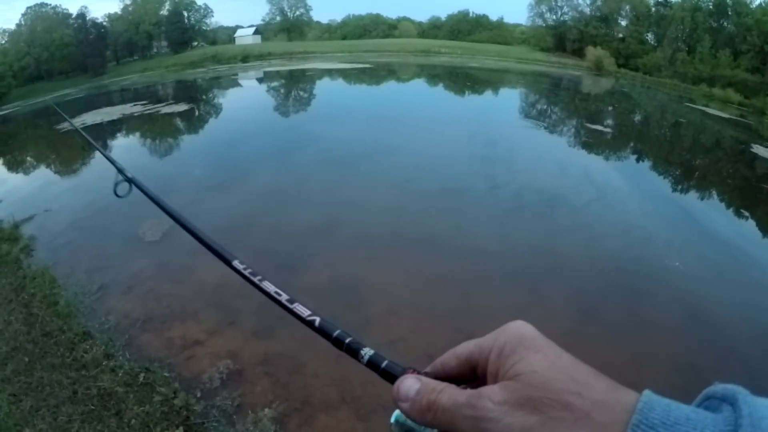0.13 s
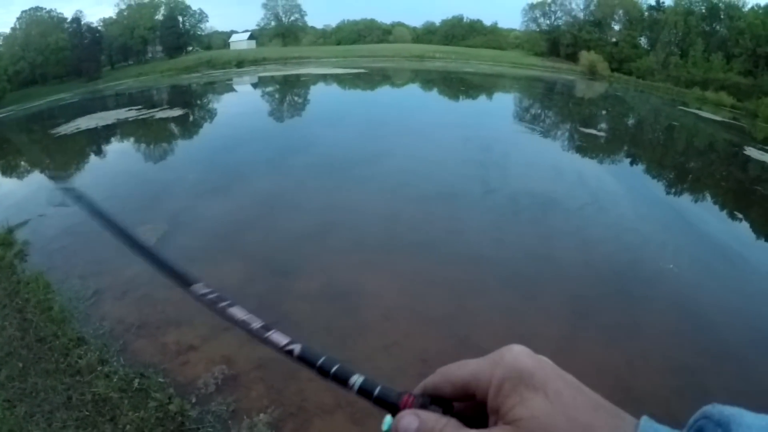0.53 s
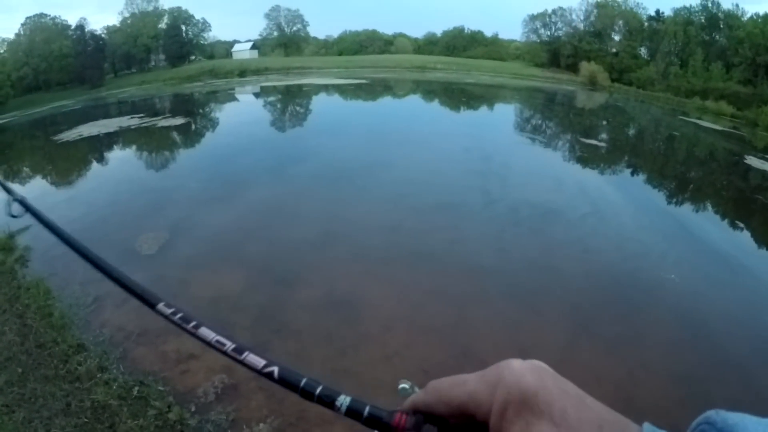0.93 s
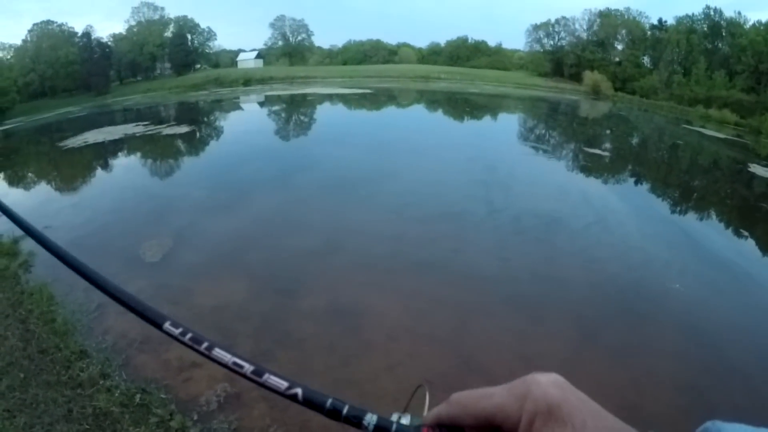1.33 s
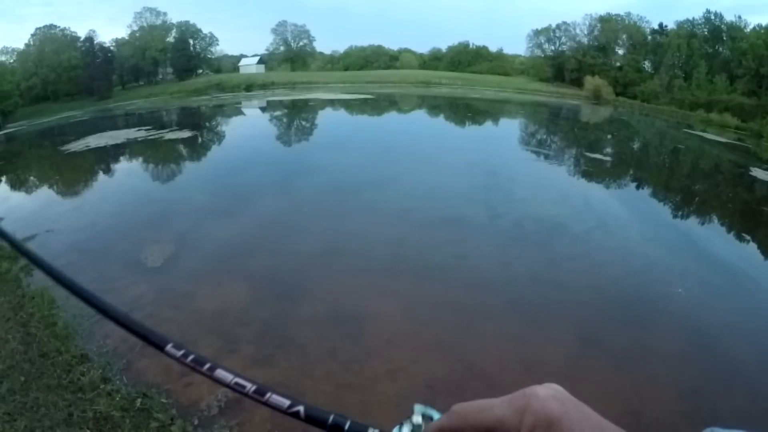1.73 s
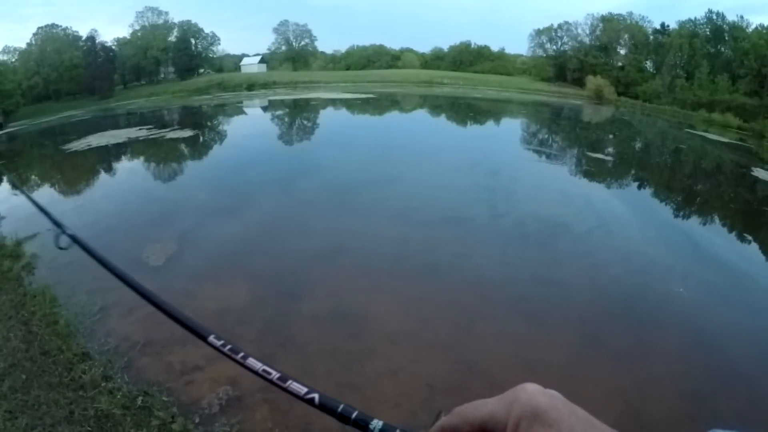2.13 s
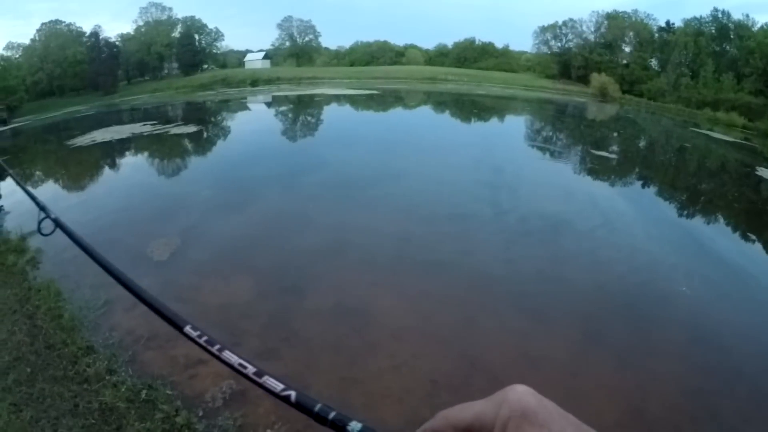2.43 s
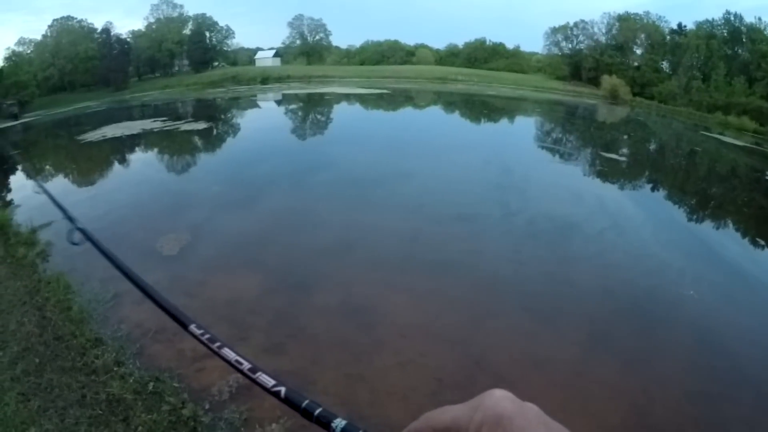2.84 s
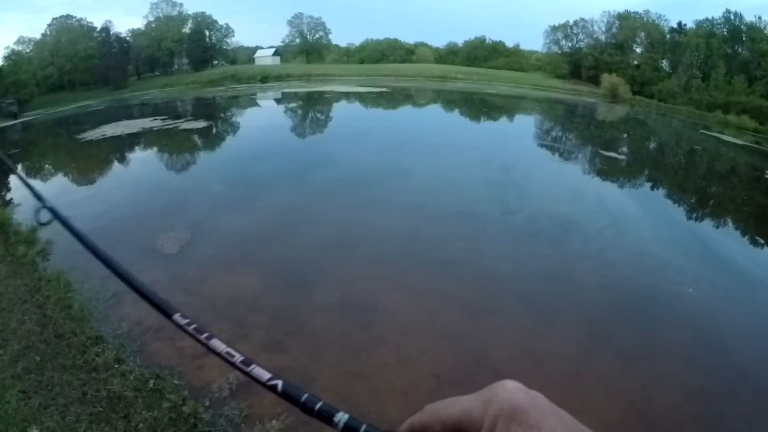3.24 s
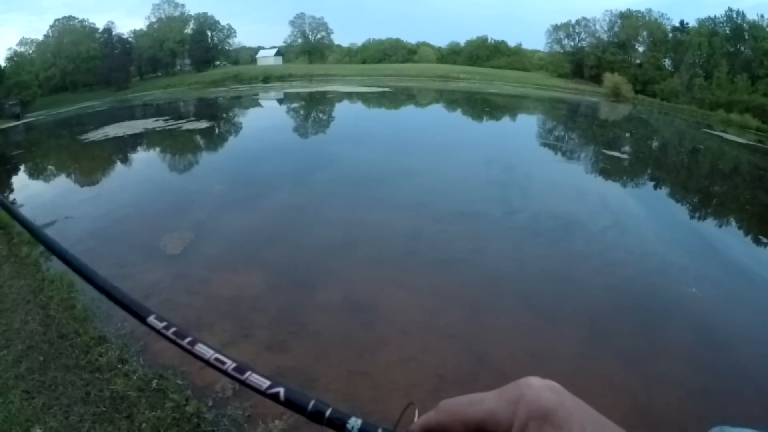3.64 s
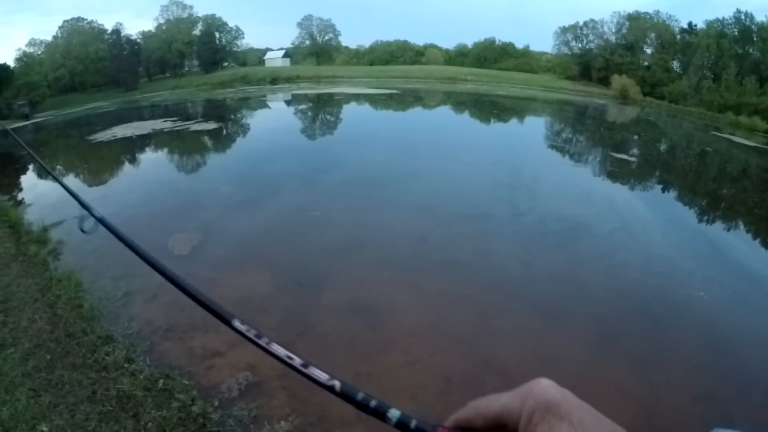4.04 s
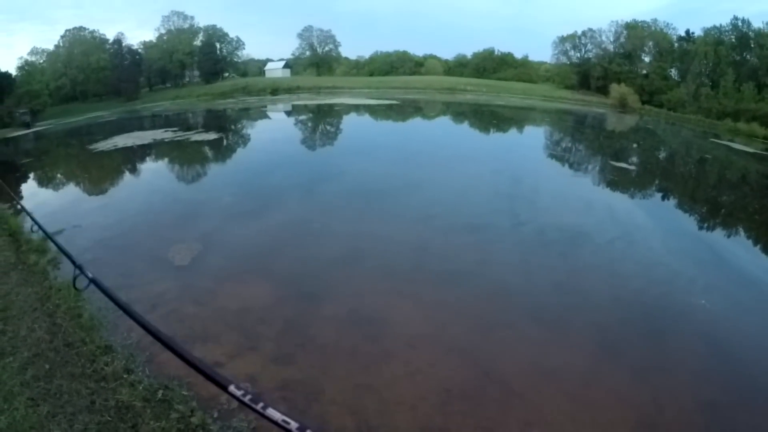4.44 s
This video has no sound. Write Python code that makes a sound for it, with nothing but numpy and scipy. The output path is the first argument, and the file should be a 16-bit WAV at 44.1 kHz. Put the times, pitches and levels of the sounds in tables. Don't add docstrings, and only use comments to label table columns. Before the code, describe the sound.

A single small frog calls close by at a quiet pond, sounding like pebbles knocked together very fast. Short stuttering groups come about six a second, then after two seconds turn into longer, even rattles. Each group ends hurried and fading. Faint echoes scatter from banks and trees over a low distant traffic rumble and soft microphone hiss.

```python
import sys
import numpy as np
from scipy import signal
from scipy.fft import rfft, irfft, next_fast_len
from scipy.io import wavfile
from scipy.ndimage import uniform_filter1d

SR = 44100
rng = np.random.default_rng(int(sys.argv[2]) if len(sys.argv) > 2 else 0)


def to_linear_factor(level_db):
    exponent = np.asarray(level_db, float) / 20
    return 10 ** exponent


def file_out(sig):
    cols = np.atleast_2d(sig).T
    lim = np.clip(cols, -1, 1)
    pcm = np.round(lim * 32767).astype(np.int16)
    wavfile.write(sys.argv[1], SR, pcm)


N = 201889


def resonance(f, hz, width):
    return width / hz / (1 - (f / hz) ** 2 + 1j * f * width / hz ** 2)


# [f/Hz, level/dB per Hz]
AIR_SPECTRUM = [(6, -38), (15, -10.5), (28, -1), (62, -3.5), (125, -13.5), (230, -26), (520, -30),
                (850, -32), (1070, -37), (1600, -38.5), (2500, -40), (4200, -40.5), (6000, -44.5),
                (15400, -52.5)]
AIR_DB = -49
# [f/Hz, width/Hz, level/dB]
ENGINE_HUMS = [
    (40.9, 2.7, -62),
    (94.66, 1.8, -61),
    (107.3, 3.9, -61),
    (126.4, 8.3, -70),
]
# [t/s, level/dB]
RUMBLE_SWELL = [(0, -50.5), (.15, -48), (.6, -49.5), (1.3, -50), (1.6, -51.5), (2.4, -52.5), (2.6, -50.5),
                (2.89, -53.5), (3.02, -49), (3.7, -50.5), (4.58, -50)]


def air():
    size = next_fast_len(N)
    f = np.fft.rfftfreq(size, 1 / SR)
    hz, db = np.transpose(AIR_SPECTRUM)
    still = to_linear_factor(np.interp(np.log(f + 1), np.log(hz + 1), db))
    field = still / np.linalg.norm(still) * to_linear_factor(AIR_DB)
    for hum_hz, width, hum_db in ENGINE_HUMS:
        hum = abs(resonance(f, hum_hz, width)) ** 2
        field = np.hypot(field, hum / np.linalg.norm(hum) * to_linear_factor(hum_db))
    noise = rfft(rng.standard_normal(size)) * field * np.sqrt(len(f))
    low = 1 / (1 + (f / 140) ** 4)
    s, swell_db = np.transpose(RUMBLE_SWELL)
    swell = to_linear_factor(np.interp(np.arange(N) / SR, s, swell_db - swell_db.mean()))
    rumble = irfft(noise * low, size)[:N] * swell
    hiss = irfft(noise * (1 - low), size)[:N]
    return rumble + hiss


# [t/s, breath/ms, first gap/ms, second gap/ms, growth of each later gap/ms]
STUTTERS = [(.07034, 30, 12.7, 9.3, -4.6), (.22917, 28.7, 12.2, 9.9, -5.3), (.3751, 53.1, 36.4, 9.1, -4.7),
            (.54861, 36, 12.4, 12, -3.2), (.70857, 29.2, 10.3, 9.5, -1.9), (.85147, 55.3, 38.3, 9.15, -4.4),
            (1.01929, 71.7, 10.6, 53.45, -49.3), (1.19676, 67.2, 51.1, 8.4, -3.1),
            (1.39592, 35.7, 12.7, 10.8, -1.1), (1.54596, 54.5, 36.1, 10, -4.7),
            (1.70888, 63.3, 46.4, 9.4, -3.5), (1.88515, 69.6, 10.5, 51, -45.5)]
# [t/s, breath/ms, first gap/ms, second gap/ms, growth of each later gap/ms]
RATTLES = [(2.0654, 56.3, 13.9, 14.9, 7.6), (2.24867, 41.7, 11.7, 10.9, 0.4),
           (2.41447, 47.9, 12.1, 11.7, 1.0), (2.5769, 68.1, 19.3, 12.8, 1.2),
           (2.76417, 49.1, 12.4, 11.8, 1.1), (2.93572, 60.0, 16.2, 13.4, 1.1),
           (3.11959, 67.2, 14.8, 13.4, 1.4), (3.31108, 51.5, 12.0, 11.6, -0.3),
           (3.48094, 71.2, 20.8, 14.8, -0.8), (3.67541, 55.2, 11.5, 11.2, 0.7),
           (3.8515, 73.6, 14.4, 12.7, 1.6), (4.04975, 62.1, 11.1, 11.2, 2.4),
           (4.23586, 74.7, 15.9, 12.7, 1.0), (4.43366, 74.3, 12.6, 11.0, 1.9)]
# [t/s, peak level/dB]
EFFORT = [(0, -25), (.4, -25), (.9, -25), (1.4, -24.5), (1.9, -24.5), (2.25, -24.5), (2.55, -25),
          (2.9, -24.6), (3.15, -25.5), (3.32, -24), (3.5, -25), (3.68, -24.5), (3.85, -25), (4.05, -25.5),
          (4.24, -26), (4.58, -25.5)]
# [shortest/ms, longest/ms]
PAUSE_MS = (17, 40)
BEFORE_DB, AFTER_DB = -1, 1.67
HURRY, HURRY_BEND = .71, 7
SPENT_MS, RESET_MS = .95, 2.3
DROOP_DB = -.25
FAINT_DB, FAINT_BEND = -15, 1.05
REFILL_DB_PER_MS = .13
SHORT_MS, EVEN_MS, LONG_MS = 12, 12.53, 14.3
FIRST_HZ, STEP_HZ, SLUMP_HZ = 3439, 26, 260
RING_WIDTH, CHOKE_WIDTH = 188, 200
LOOSE_WIDTH, LOOSEN_PER_S = 20, 15


def clicks():
    rows = []
    for start, breath, first, second, slowing in STUTTERS + RATTLES:
        ms = [0, first, first + second]
        while (1 - HURRY) * (breath - ms[-1]) > SPENT_MS:
            pace = max(second + slowing * (len(ms) - 2), RESET_MS)
            limit = HURRY * (breath - ms[-1])
            gap = (pace ** -HURRY_BEND + limit ** -HURRY_BEND) ** (-1 / HURRY_BEND)
            ms.append(ms[-1] + gap)
        k = np.arange(len(ms))
        left = breath - np.array(ms)

        pause = np.interp(max(first, second), PAUSE_MS, (0, 1))
        held = pause * np.where(k > (second > first), AFTER_DB, BEFORE_DB)
        gaps = np.clip(np.diff(ms, prepend=-EVEN_MS), SHORT_MS, LONG_MS)
        refill = REFILL_DB_PER_MS * np.cumsum(gaps - EVEN_MS)
        effort = np.interp(start, *np.transpose(EFFORT))
        db = effort + held + refill + DROOP_DB * k + FAINT_DB / left ** FAINT_BEND

        hz = FIRST_HZ + STEP_HZ * k - SLUMP_HZ / (left ** 2 + 1)
        loose = (LOOSE_WIDTH + LOOSEN_PER_S * start) * .5 ** k
        width = RING_WIDTH + loose + CHOKE_WIDTH / (left ** 2 + .28)
        rows += zip(start + np.array(ms) / 1000, db, hz, width, left, k)
    return np.array(rows)


# [f/Hz, width/Hz]
THROAT = [
    (3007, 346),
    (4857, 754),
]
# [f/Hz, width/Hz, level/dB, polarity]
LEAKS = [
    (1973, 727, -64.6, -1),
    (2416, 560, -59.7, 1),
    (5106, 814, -55, 1),
    (6760, 640, -64.9, -1),
]
# [t/s, f/Hz]
MOUTH = [
    (0, 3700),
    (1, 3780),
    (1.9, 3760),
    (2.4, 3680),
    (2.9, 3590),
    (3.6, 3570),
    (4.58, 3600),
]
MOUTH_WIDTH, MOUTH_RISE = 790, 2.2
SAC_REST_HZ = 3490
# [level/dB, f/Hz, width/Hz]
WOBBLE = (.3, 5, 10)
SHUT_MS, SHUT_DB_PER_MS = .5, -14


def frog():
    size = 2048
    out = np.zeros(N + size)
    f = np.fft.rfftfreq(size, 1 / SR)
    ms = np.arange(size) / SR * 1000
    throat = np.prod([resonance(f, hz, width) for hz, width in THROAT], axis=0)
    leak = sum(np.sign(sign) * to_linear_factor(db) * resonance(f, hz, width) ** 2 for hz, width, db, sign in LEAKS)
    rows = clicks()[:, :5]
    rows = rows + rng.standard_normal(rows.shape) * (0, *WOBBLE, 0)
    for s, db, hz, width, left in rows:
        at = int(s * SR)
        mouth_hz = np.interp(s, *np.transpose(MOUTH)) + MOUTH_RISE * (hz - SAC_REST_HZ)
        mouth = resonance(f, mouth_hz, MOUTH_WIDTH)
        sac = resonance(f, hz, width) * 220 / width
        path = throat * mouth * sac + leak
        late = np.exp(-2j * np.pi * f * (s - at / SR))
        click = irfft(path * late, size)
        shut_db = SHUT_DB_PER_MS * np.maximum(ms - left - SHUT_MS, 0)
        out[at:at + size] += to_linear_factor(db + shut_db) * click / abs(click).max()
    return out[:N]


# [delay t/s, spread t/s, energy level/dB]
ECHOES = [
    (.008, 0.0014, -26.5),
    (.025, .012, -40),
    (.08, 0.0075, -33.5),
    (.13, 0.016, -39),
    (.29, 0.043, -36.5),
    (.45, 0.087, -36.5),
]
# [f/Hz, width/Hz, outside level/dB]
FOLIAGE = (3470, 450, -4)


def echoes(x):
    t = np.arange(SR * 3 // 4) / SR
    power = np.zeros(len(t))
    for s, spread, db in ECHOES:
        bunch = np.exp(-.5 * ((t - s) / spread) ** 2)
        power += to_linear_factor(db) ** 2 * bunch / (spread * SR * np.sqrt(2 * np.pi))
    sparse = rng.random((3, len(t))) < 1 / 16
    taps = rng.standard_normal((3, len(t))) * sparse * 4
    hz, width, outside_db = FOLIAGE
    colour = abs(resonance(np.fft.rfftfreq(len(t), 1 / SR), hz, width)) + to_linear_factor(outside_db)
    tails = irfft(rfft(taps * np.sqrt(power)) * colour, len(t))
    turn = 2 * np.pi * (np.arange(N) / SR * 3.1 + np.arange(3)[:, None] / 3)
    shares = np.sqrt((1 + np.cos(turn)) / 3)
    return signal.fftconvolve(x * shares, tails, axes=1)[:, :N].sum(0)


# [t/s, level/dB, f/Hz, length t/s]
INSECT_TICK = (3.572, -67, 5650, .012)


def insect():
    s, db, hz, length = INSECT_TICK
    t = np.arange(N) / SR - s
    return to_linear_factor(db) * np.exp(-.5 * (4 * t / length) ** 2) * np.sin(2 * np.pi * hz * t)


# [lower edge f/Hz, widening of the gaps t/s, share of gaps that reach it, share of calm blocks lost]
STRIPS = [
    (12850, 0, .75, 0),
    (13250, .001, 1, 0),
    (14950, .006, 1, .04),
    (15120, .009, 1, .4),
    (15330, 9, 1, 1),
]
STARVE_MS, RECOVER_MS, STARVE_DB = 20, 5, -20
STARVE_CHANCE, STARVE_FADE = .9, .82
PUFF_DB = 9


def starved(x):
    t, block = np.arange(N) / SR, 1024
    s, place = clicks()[:, [0, 5]].T
    wait = np.diff(s, prepend=0)
    paused = (place > 0) & (wait > PAUSE_MS[1] / 2000)
    chance = np.where(paused, 1, STARVE_CHANCE * STARVE_FADE ** place)
    luck = rng.random((len(s), 4 + len(STRIPS)))

    after_last = s - wait + RECOVER_MS / 1000 * 2 * luck[:, 0]
    ahead = s - STARVE_MS / 1000 * (.4 + luck[:, 0])
    start = np.where(place > 0, after_last, ahead)
    group_luck = luck[np.arange(len(s)) - place.astype(int), 1]
    hit = (group_luck < chance) & (start < s - .004)

    puff_db = np.zeros(N)
    for at, u in zip(s + .001, luck[:, 2] / chance ** 2):
        if u < 1:
            puff_db += PUFF_DB * (.6 + .5 * u) * np.exp(-.5 * ((t - at) / .0016) ** 2)

    above = []
    for edge_hz, *_ in STRIPS:
        highpass = signal.firwin(1023, edge_hz, window=("kaiser", 9), pass_zero=False, fs=SR)
        above.append(signal.oaconvolve(x, highpass[None], "same"))
    out = x - above[0]
    for (_, widen, reach, lost), low, high, reached in zip(STRIPS, above, above[1:], luck[:, 4:].T):
        lost_blocks = np.repeat(rng.random(N // block + 1) < lost, block)[:N]
        strip_db = puff_db - 40 * lost_blocks
        for i in np.flatnonzero(hit & (reached < reach)):
            begin = round((start[i] - widen) * SR)
            end = round((s[i] - .001 + widen) * SR)
            strip_db[begin:end] = STARVE_DB * (1 + luck[i, 3])
        out = out + (low - high) * uniform_filter1d(to_linear_factor(strip_db), 96)
    return out


def scene():
    calls = frog()
    return (calls + echoes(calls) + insect() + air())[None]


def top_cut(x):
    return signal.sosfilt(signal.butter(12, 15590, fs=SR, output="sos"), x)


def record(dry):
    mix = starved(dry)
    return top_cut(mix)


dry = scene()
out = record(dry)
file_out(out)
```